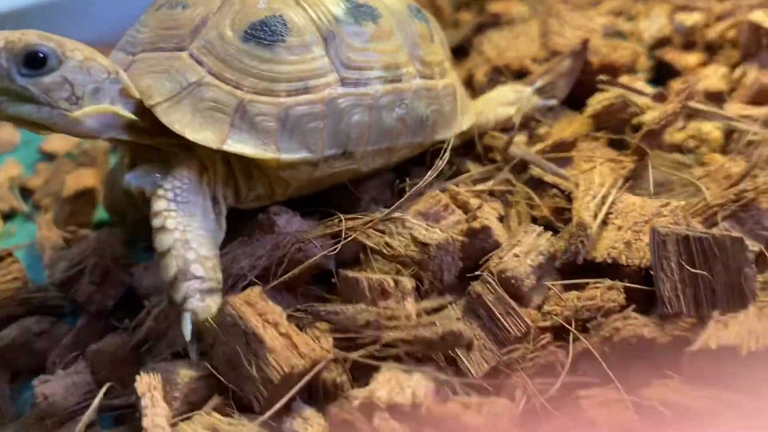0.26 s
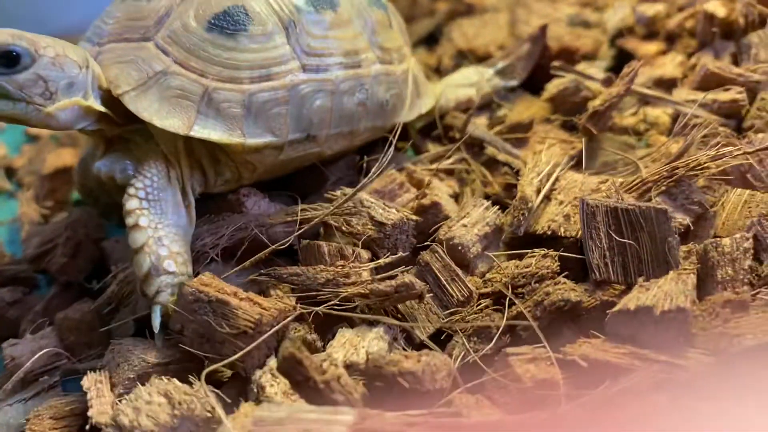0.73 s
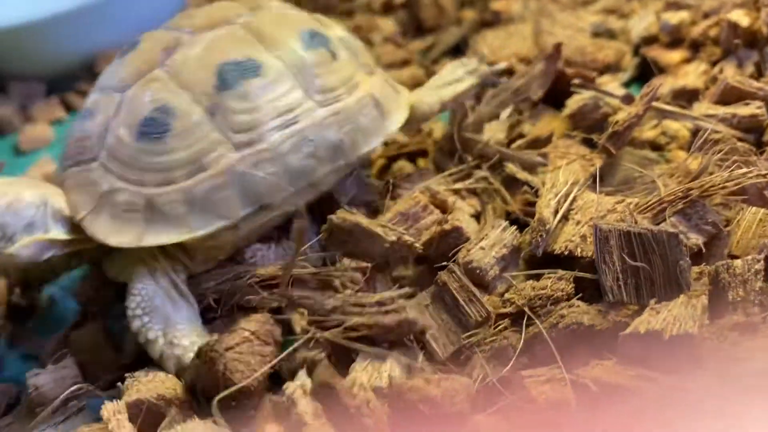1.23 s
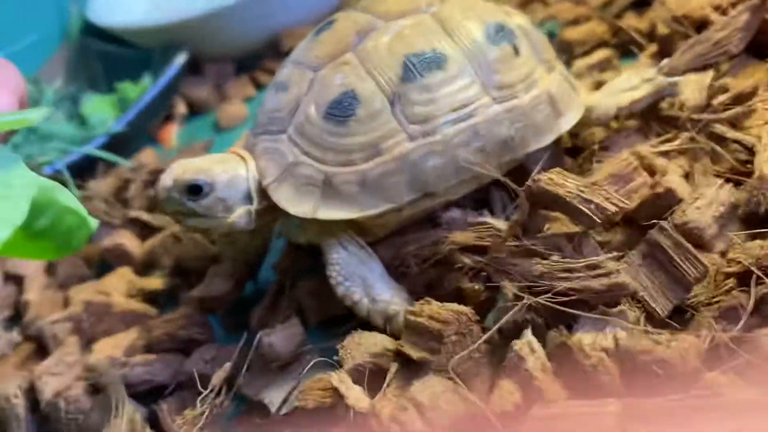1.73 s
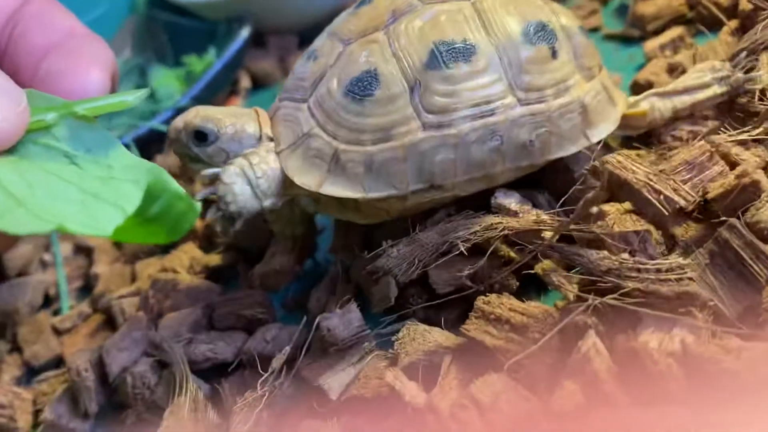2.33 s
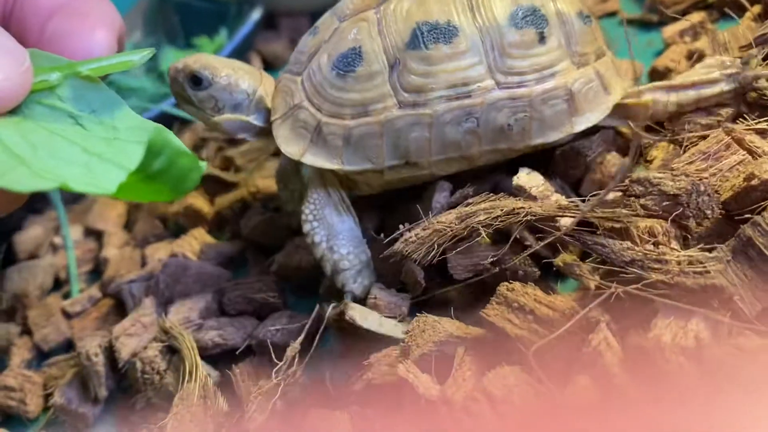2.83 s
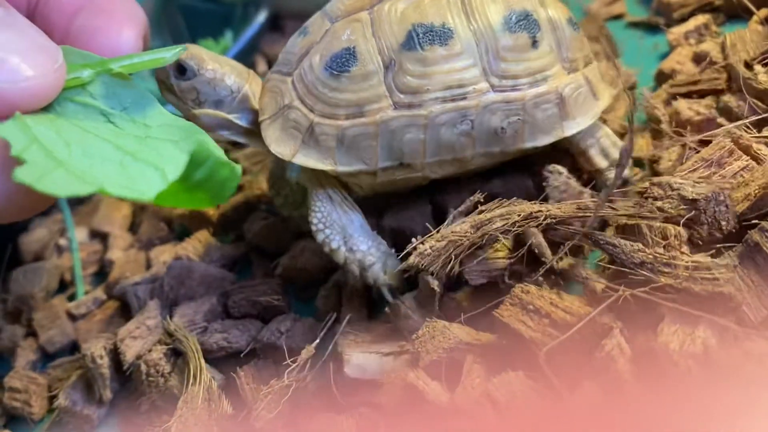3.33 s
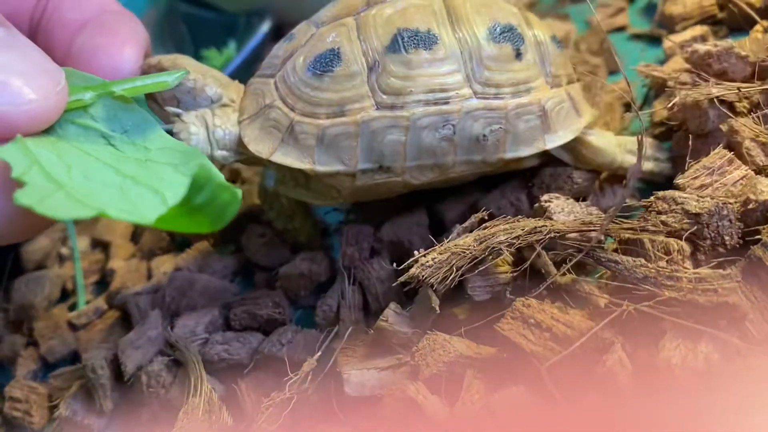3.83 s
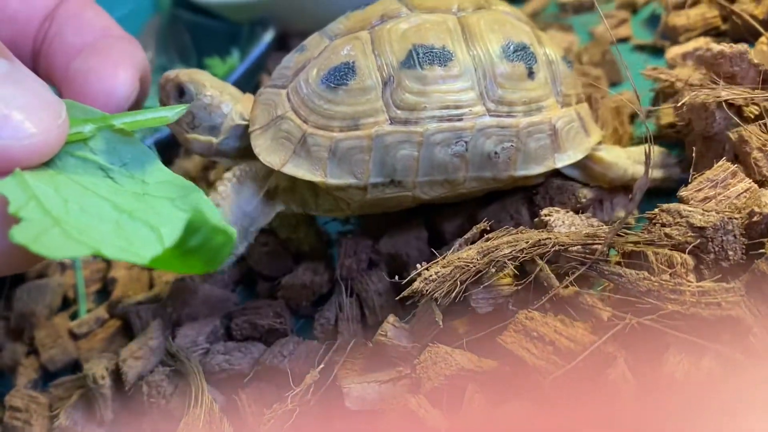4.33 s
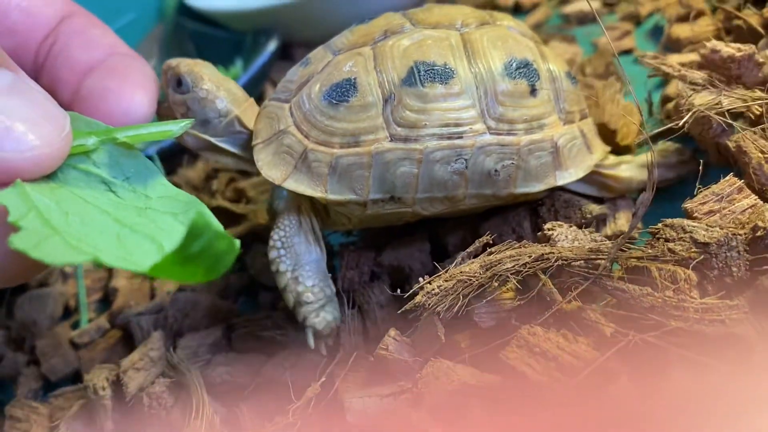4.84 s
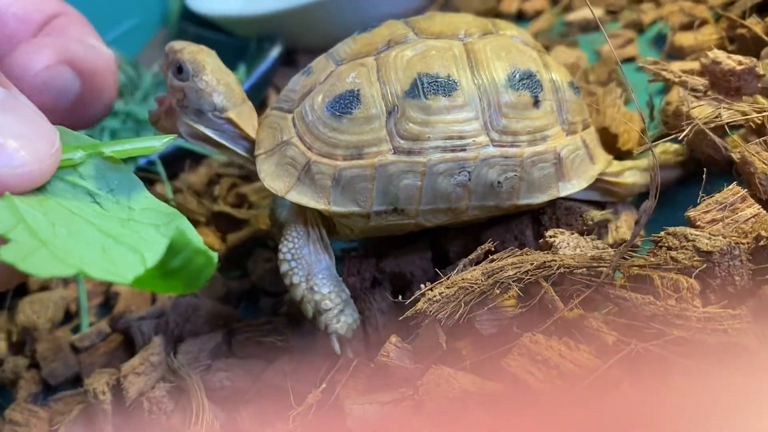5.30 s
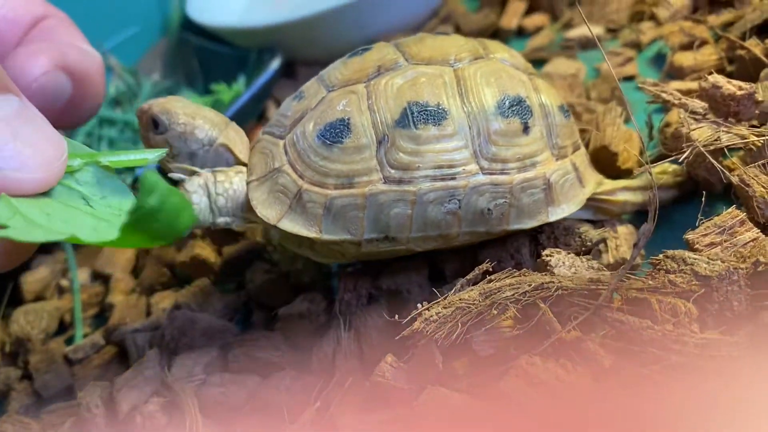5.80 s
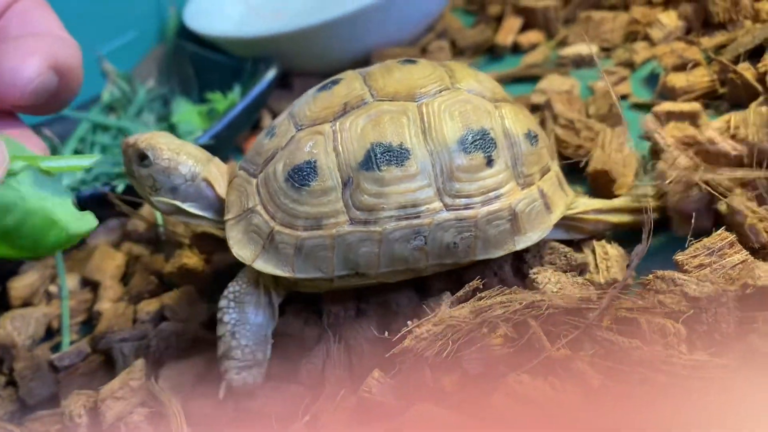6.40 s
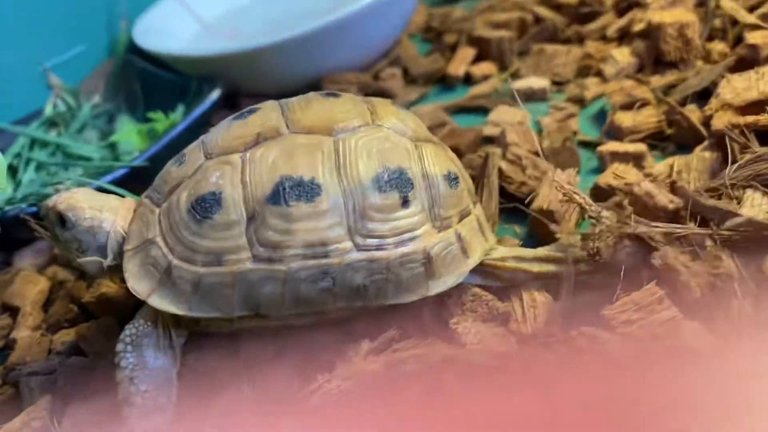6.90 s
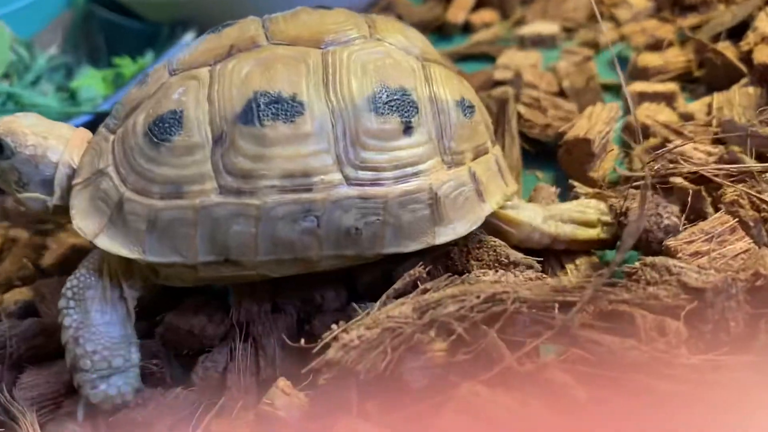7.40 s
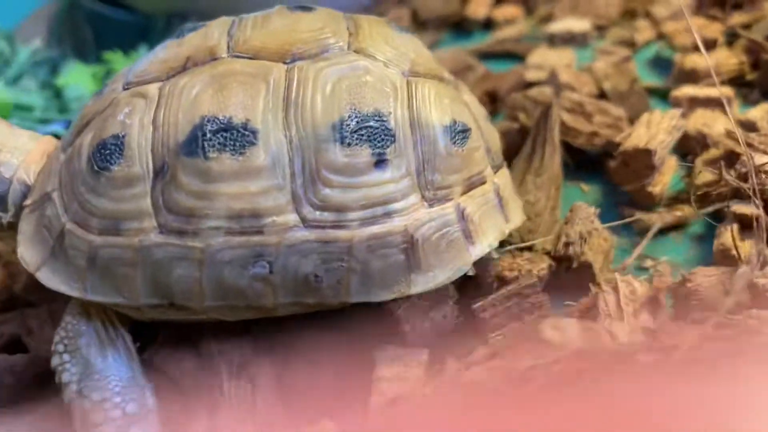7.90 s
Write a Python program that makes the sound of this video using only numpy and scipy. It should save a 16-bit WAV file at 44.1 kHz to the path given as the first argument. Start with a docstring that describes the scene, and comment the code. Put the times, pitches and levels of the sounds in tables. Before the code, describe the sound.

Dry chips rustle, tick and knock in irregular clusters under slow little feet, with low rumbles through the plastic floor. Early on, several dull bumps thud against the tub. The middle is sparse and delicate, over faint room murmur and low hum. Finally the crunching grows stronger, with bright snaps and a momentary squeak. Very close, dry stereo pickup with short tub reflections.

```python
"""A quiet room, microphone pair close to a plastic tub where a small tortoise walks over dry wood chips.
The chips rustle and snap under its feet: clumped grains of noise, coloured for grinding, hiss and rumble.
Its weight rumbles in the tub floor; early on the tub takes soft bumps, falling tones with a dull knock,
while a hand brings in a leaf. Late on a claw squeaks on a chip, a gliding tone with grit.
Dragged and struck chips ring, and the tub walls reflect it all over a faint murmur and hum."""
import sys
import numpy as np
from scipy import signal
from scipy.fft import rfft, irfft, next_fast_len
from scipy.io import wavfile

SR = 44100
rng = np.random.default_rng(int(sys.argv[2]) if len(sys.argv) > 2 else 0)


def pcm_store(signal):
    """Save signal as 16-bit PCM."""
    levels = np.round(np.clip(np.atleast_2d(signal), -1, 1) * 32767)
    wavfile.write(sys.argv[1], SR, levels.astype(np.int16).T)


N = 359415
TIME = np.arange(N) / SR

# colour of the finest breaking: hz, level_db
SNAP = [(1200, -21.5), (3000, -7.5), (5000, -5), (8000, -4), (12500, -0.5), (14500, -10), (16000, 3)]


def amp(db):
    """Decibels to gain."""
    return 10 ** (np.asarray(db) / 20)


def evened(x):
    """Scales to an rms of one."""
    return x / np.sqrt(np.mean(x ** 2) + 1e-20)


def colour(x, points, size=8192):
    """Filters by a spectrum of (Hz, dB) points, causally, so that attacks stay sharp."""
    f, db = np.transpose(points)
    gain = amp(np.interp(np.log(np.fft.rfftfreq(size, 1 / SR) + 1), np.log(f), db))
    # folding the cepstrum gives the minimum-phase filter
    cepstrum = irfft(np.log(gain))
    cepstrum[1:size // 2] *= 2
    cepstrum[size // 2 + 1:] = 0
    taps = irfft(np.exp(rfft(cepstrum)))[:size // 2]
    return signal.oaconvolve(x, np.array(taps, ndmin=x.ndim), axes=-1)[..., :x.shape[-1]]


def resonate(x, hz, width):
    """One resonance of gain one at its peak."""
    return signal.lfilter(*signal.iirpeak(min(hz, SR / 2 - 1), hz / width, SR), x)


def resonate_twice(x, hz, width):
    """The same resonance passed twice, for steeper sides."""
    return resonate(resonate(x, hz, width), hz, width)


def wander(length, rate):
    """Random drift of about unit size, in straight lines between rate random points a second."""
    knots = rng.standard_normal(length // 20 + 2)
    return np.interp(np.arange(length) * rate / SR, np.arange(len(knots)), knots)


def add(mix, s, sound):
    """Mixes a sound in at s seconds."""
    part = mix[..., max(round(s * SR), 0):][..., :sound.shape[-1]]
    part += sound[..., :part.shape[-1]]


def play(table, source):
    """Sounds every row of an event table at its time."""
    out = np.zeros(N)
    for s, *row in table:
        add(out, s, source(*row))
    return out


def grains(per_s, spread_db, clump_db, clump_rate, apart):
    """Tiny slips of uneven size in clumps; apart (0-1) is how differently the two microphones hear each."""
    size = amp(spread_db * np.minimum(rng.exponential(1, N), 4)) * rng.choice([-1, 1], N)
    apart = np.clip(apart, 0, 1)
    heard = np.sqrt(1 - apart) + np.sqrt(apart) * rng.choice([-1, 1], (2, N))
    happens = rng.random(N) < per_s / SR
    return heard * size * happens * amp(clump_db * wander(N, clump_rate))


def swell(start, length):
    """The shape of one push: it swells, holds and dies away exponentially."""
    attack_s, release_s = 0.0347, 0.058
    before = np.maximum(start - TIME, 0)
    after = np.clip(TIME - start - length, 0, 1)
    return np.exp(-before / attack_s - after / release_s)


def room():
    """Almost steady indoor murmur of ventilation: both microphones share the bass, not the hiss."""
    # colour of the murmur: hz, level_db
    room_colour = [(20, -28), (40, -9.5), (70, -2), (110, -10.5), (170, -10.5), (280, -14.5), (450, -19),
                   (700, -21), (1100, -29.5), (2500, -37), (5200, -51.5), (5600, -33.5), (6000, -70),
                   (15000, -102)]
    shared, apart = rng.standard_normal(N), rng.standard_normal((2, N))
    bass = colour(shared, [(150, 6.0), (600, -8), (1500, -11.0)])
    upper = colour(apart, [(60, -11.0), (300, -2), (1200, 1.0)])
    return amp(-56.0) * evened(colour(bass + upper, room_colour)) * amp(0.38 * wander(N, 4.3))


def hum_swell(length, db):
    """A low tone rises and sinks again."""
    t = np.arange(0, length, 1 / SR)
    return amp(db) * np.sin(2 * np.pi * 137.5 * t) * np.sin(np.pi * t / length) ** .5


def hum():
    """Faint low tones that waver, being resonant noise; another low tone swells twice."""
    # the room's low tones: hz, width_hz (of each of two passes), level_db
    hum_tones = [(75.8, 24, -68), (158.6, 20, -78), (245.14, 11.5, -69), (335.7, 30, -78),
                 (467.7, 11, -79.5), (691.6, 27, -80)]
    # the swelling tone: start_s, length_s, level_db
    hum_swells = [(0.0, 0.473, -51), (5.83, 0.34, -51.5)]
    tones = sum(amp(db) * evened(resonate_twice(rng.standard_normal(N), hz, width))
                for hz, width, db in hum_tones)
    return tones + play(hum_swells, hum_swell)


def strokes():
    """Legs push through the bedding: pressure and brushing over time, as gains summed in power."""
    # pushes of a leg: start_s, length_s, pressure_db (on the chips), brush_db (on dry fibres)
    pushes = [(0.0, 0.055, -68, -80), (0.142, 0.1, -67, -71.5), (0.49, 0.182, -68.5, -72),
              (0.838, 0.037, -71, -72.5), (1.047, 0.21, -58.5, -60), (1.39, 0.213, -72, -76.5),
              (1.6, 0.53, -64, -72), (2.23, 0.18, -63.5, -71.5), (2.623, 0.47, -72, -73),
              (2.753, 0.0218, -62.5, -74.5), (3.052, 0.242, -65.5, -71), (3.182, 0.02, -65, -61),
              (3.433, 0.0913, -64.5, -70.5), (3.617, 0.0925, -62, -67), (3.985, 0.1267, -62.5, -74),
              (4.346, 0.03, -65, -75), (4.572, 0.224, -78.5, -79), (5.258, 0.04, -59.5, -68),
              (5.39, 0.025, -67.5, -76), (5.535, 0.116, -69, -84), (5.883, 0.1015, -69, -76),
              (6.087, 0.014, -62.5, -75), (6.235, 0.0194, -63.5, -78), (6.303, 0.0544, -62.5, -75),
              (6.603, 0.498, -69, -79.5), (6.88, 0.136, -62.5, -73.5), (7.2, 0.34, -62, -71),
              (7.527, 0.023, -60, -73), (7.598, 0.11, -54.5, -61.5), (7.743, 0.087, -54.5, -57),
              (7.88, 0.13, -62, -69), (8.111, 0.028, -55, -64.5)]
    # the legs never quite come to rest
    idle_pressure_db, idle_brush_db = -81, -89
    power = amp([[idle_pressure_db], [idle_brush_db]]) ** 2 * np.ones(N)
    for start, length, pressure_db, brush_db in pushes:
        power += amp([[pressure_db], [brush_db]]) ** 2 * swell(start, length) ** 2
    return np.sqrt(power)


def weight(pressure):
    """Gain of the floor's rumble: it follows the pressure and rises with each heave."""
    # the whole weight shifts: start_s, length_s, level_db
    heave_rows = [(0.006, 0.629, -53), (0.75, 0.19, -55), (1.058, 0.3, -47), (2.268, 0.21, -54.5),
                  (2.764, 0.14, -59.5), (4.026, 0.024, -52.5), (5.272, 0.033, -65), (6.089, 0.0394, -45.5),
                  (6.214, 0.07, -50.5), (6.311, 0.19, -53), (7.582, 0.3, -54), (8.09, .05, -49.5)]
    # rumble level at a firm push, and dB gained per dB of pressure
    firm_db, rumble_db, rumble_slope = -59, -52, 0.59
    heaves = sum(amp(db) * swell(start, length) for start, length, db in heave_rows)
    pressed = amp(rumble_db) * (pressure / amp(firm_db)) ** rumble_slope
    return np.hypot(pressed, heaves)


def scrape(length, db, hz, width_hz):
    """A chip drags: uneven slips wake short resonances, whose pitch wanders as the contact moves."""
    # resonances the slips wake: multiple (of the scrape's pitch), level_db
    dragged = [(.47, -17), (1, 5), (1.65, -12.5)]
    slips_per_s, slip_spread_db, drift = 1300, 4.5, .045
    count = int(length * SR)
    size = amp(slip_spread_db * rng.standard_normal(count))
    slips = size * (rng.random(count) < slips_per_s / SR) + .02 * rng.standard_normal(count)
    turns = np.cumsum(hz * (1 + drift * wander(count, 170))) / SR
    r = np.exp(-np.pi * width_hz / SR)
    sound = np.zeros(count)
    for k, level in dragged:
        # shift the moving pitch down to zero, resonate there with a double pole, shift back
        turn = np.exp(2j * np.pi * k * turns)
        sound += amp(level) * (turn * signal.lfilter([1], [1, -2 * r, r * r], slips / turn)).real
    return amp(db) * evened(sound) * signal.windows.tukey(count, .5)


def loose_chips():
    """Loose chips are rubbed in short random spells, each at a pitch, strength and side of its own."""
    # pitches of rubbed loose chips before detuning: pitch_hz
    loose = [670, 880, 1450, 1650, 1760, 1990, 2380, 2770, 3760, 4590]
    spells_per_s, spell_s, spell_spread_db = 130, .014, 3.5
    out = np.zeros((2, N))
    for when, which, detune, size, side in rng.random((int(spells_per_s * N / SR), 5)):
        hz = loose[int(which * len(loose))] * (.93 + .14 * detune)
        # higher chips are weaker
        db = spell_spread_db * min(-np.log(1 - size), 3) - 3.6 * np.log2(hz / loose[0])
        pan = np.sqrt([[side], [1 - side]])
        add(out, when * N / SR, pan * scrape(spell_s, db, hz, 300))
    return evened(out)


def rustle():
    """Feet press the bedding: the tub floor rumbles, chips grind, dry fibres hiss and now and then tick."""
    # colours of floor, chips and fibres: hz, level_db
    rumble_colour = [(25, -16), (55, 4), (120, 0.5), (190, -2), (240, -1.5), (290, -10), (345, -2),
                     (420, -19), (530, -24.5), (660, -11.5), (1100, -48.5), (2500, -69.5)]
    grind_colour = [(250, -51.5), (580, 3.5), (700, 2), (900, 2), (1150, -5), (1550, 0), (1720, -2),
                    (2000, -5), (2500, -9), (4500, -15.5), (6000, -19), (12000, -46)]
    hiss_colour = [(900, 0.5), (2000, 4.5), (4000, 0), (5500, 0), (7300, 3.5), (9500, -0.5), (12800, 4.5),
                   (14500, 0), (16000, -18.5)]
    grind_gain, hiss_gain = strokes()
    rumble_gain = weight(grind_gain)
    floor = grains(per_s=900, spread_db=0.0, clump_db=4.5, clump_rate=35, apart=0.11)
    rumble = evened(colour(floor, rumble_colour))
    rubbed = grains(per_s=1800, spread_db=2.0, clump_db=5.0, clump_rate=83, apart=0.39)
    grind = evened(colour(rubbed, grind_colour))
    brushed = grains(per_s=6000, spread_db=2.0, clump_db=3.0, clump_rate=120, apart=0.029)
    hiss = evened(colour(brushed, hiss_colour))
    broken = grains(per_s=130, spread_db=5, clump_db=2.5, clump_rate=15, apart=.2)
    ticks = amp(-6.5) * evened(colour(broken, SNAP))
    chips = amp(-1.0) * grind + amp(-7.5) * loose_chips()
    # the rumble leans to the right microphone
    floor_part = amp([[-1.4], [1.4]]) * rumble * rumble_gain
    return floor_part + chips * grind_gain + (amp(2.0) * hiss + ticks) * hiss_gain


def fibre(db):
    """A dry fibre breaks at once: a thin, bright tick of decaying noise."""
    t = np.arange(SR // 50) / SR
    tick = colour(rng.standard_normal(len(t)) * np.exp(-t / .0008), SNAP)
    return amp(db) * tick / abs(tick).max()


def chip(crack_db, ring_hz, thud_db, snap_db):
    """A chip gives way: slips build up and die in milliseconds, it rings and knocks on the tub floor."""
    # colours of the crack and of the thud on the floor: hz, level_db
    crack_colour = [(200, 0.5), (500, -3.5), (820, 6), (1150, -3.5), (1650, 1.5), (2200, -7.5), (4500, -15),
                    (6500, -25.5), (10000, -29)]
    thud_colour = [(30, -1), (70, -9.5), (150, 3), (240, 0), (290, -8), (350, 0.5), (430, -13.5),
                   (550, -16), (700, -16.5), (1200, -47.5)]
    t = np.arange(SR // 10) / SR
    a, b, c = rng.standard_normal((len(t), 3)).T
    build_s = 0.002
    u = t / build_s
    burst = (u * np.exp(1 - u)) ** 2 + amp(-27) * np.exp(-t / .009)  # with a faint tail
    crack = colour(a * burst, crack_colour)
    crack = evened(crack) + amp(-2) * evened(resonate(crack, ring_hz, width=400))
    snap = colour(b * (u * np.exp(1 - 1.07 * u)) ** 2, SNAP)  # the finest fibres break first
    thud = colour(c * t * np.exp(-t / 0.0057), thud_colour)
    parts = ((crack, crack_db), (snap, snap_db + 9.0), (thud, thud_db + 0.5))
    return sum(amp(db) * x / abs(x).max() for x, db in parts)


def bump(db, start_hz, end_hz, swell_s, knock_db, knock_hz):
    """A dull knock, then bending waves in the tub: the high ones come first, so the thump falls in pitch."""
    # the tub's ring: hz (before random detuning), level_db, t60_s
    tub_modes = [(53, -7.5, .19), (74, -11, .22), (152, -19, .17), (320, -15, .06), (362, -13.5, .07),
                 (468, -23, .06), (675, -29, .07), (910, -39, .05)]
    # colour of the contact: hz, level_db
    knock_colour = [(200, 5.5), (380, -1), (520, -18.5), (680, -6), (920, -13), (1250, -18.5), (2000, -22),
                    (4000, -38.5), (8000, -42)]
    t = np.arange(SR // 3) / SR
    hz = end_hz + (start_hz - end_hz) * np.exp(-t / 0.0066)
    wave = np.sin(2 * np.pi * np.cumsum(hz) / SR) * (t / swell_s * np.exp(1 - t / swell_s)) ** 3.8
    modes = np.zeros(len(t))
    for f, level, t60 in tub_modes:
        tone = np.sin(2 * np.pi * f * rng.uniform(0.909, 1.027) * t)
        # each mode takes about a cycle to build up
        modes += amp(level - 60 * t / t60) * tone * (1 - np.exp(-t * f))
    contact = colour(rng.standard_normal(len(t)) * np.exp(-t / 0.0051), knock_colour)
    # the struck spot rings briefly
    wall = np.sin(2 * np.pi * knock_hz * t) * np.exp(-t / 0.0071) * (1 - np.exp(-t * knock_hz))
    knock = amp(-1) * contact / abs(contact).max() + amp(-7) * wall
    return amp(db) * (wave + modes) + amp(knock_db - 4.5) * knock


def tub():
    """Bumps at each microphone: the left is fuller near 230 Hz, a rocking floor mode flips the right."""
    # soft bumps: start_s, level_db, start_hz, end_hz, swell_s, knock_db (before a trim), knock_hz
    bump_rows = [(1.5675, -6.5, 244, 114.6, 0.009, -21.5, 920),
                 (1.596, -22, 183, 160, 0.0092, -30.5, 680.5), (1.626, -21, 165, 141, 0.01374, -29, 890),
                 (1.66, -35, 160, 100, 0.016, -72, 680), (1.773, -26, 221, 70.6, 0.011, -64, 680),
                 (1.869, -16.5, 268, 95, 0.012, -29, 790), (1.897, -25.5, 108.7, 65, 0.0159, -45, 690),
                 (1.955, -38.5, 110, 70, 0.016, -70, 680), (2.0745, -18, 250, 81.7, 0.015, -26, 660),
                 (2.108, -17.5, 153, 87, 0.0087, -58, 676), (2.145, -42, 170, 111, 0.015, -70, 660),
                 (7.584, -33, 482, 332, 0.0045, -38, 461.3)]
    # floor mode that pushes the right microphone the other way: hz, width_hz, level_db
    rocking = (397, 200, 8.9)
    bumps = play(bump_rows, bump)
    hz, width, db = rocking
    left = colour(bumps, [(130, -1.0), (230, 4), (350, -1.5), (600, 1.5), (900, 0.0)])
    right = bumps - amp(db) * resonate(bumps, hz, width)
    return np.array([left, right])


def ring(db, hz, t60):
    """A hard chip rings on after it is struck, with a close pair of modes."""
    t = np.arange(SR // 8) / SR
    second_hz = hz * rng.uniform(1.03, 1.09)
    pair = np.sin(2 * np.pi * hz * t) + amp(-7) * np.sin(2 * np.pi * second_hz * t)
    return amp(db - 60 * t / t60) * pair * (1 - np.exp(-t * hz))


def rubbing():
    """Long, soft rubs: dense, fine slips keep a few resonances of the chips sounding."""
    # rubs over the chips: start_s, length_s, level_db
    rubs = [(1.7, .19, -63), (1.93, 0.049, -69), (2.03, 0.255, -70.5)]
    # resonances of the rubbed chips: hz, width_hz (of each of two passes), level_db
    rubbed = [(1440, 170, -1.5), (1680, 210, -2.5), (2536, 300, -9), (2960, 300, -7.5)]
    slips = grains(per_s=2500, spread_db=2, clump_db=3, clump_rate=110, apart=.5)
    body = sum(amp(db) * resonate_twice(slips, hz, width) for hz, width, db in rubbed)
    power = sum((amp(db) * swell(start, length)) ** 2 for start, length, db in rubs)
    return evened(body) * np.sqrt(power)


def squeak(length, db, start_hz, end_hz, grit_db):
    """A claw sticks and slips at a chip's pitch; grit unsteadies it and wakes the other resonances."""
    # resonances of the squeaking chip: hz, width_hz (of each of two passes), level_db
    scraped = [(1735, 250, 0.5), (2290, 223, 7), (2626, 120, 13.5), (3740, 340, 7.5), (4250, 400, 2),
               (5080, 720, -3.5), (7060, 2200, -10.5), (11980, 4000, -9.5)]
    count = int(length * SR)
    uneven = min(amp(grit_db), 1)
    hz = np.linspace(start_hz, end_hz, count) * (1 + 0.045 * uneven * wander(count, 600))
    tone = np.sin(2 * np.pi * np.cumsum(hz) / SR) * amp(3.5 * uneven * wander(count, 500))
    slips = rng.standard_normal(count) * amp(3 * wander(count, 560))
    grit = sum(amp(level) * resonate_twice(slips, f, w) for f, w, level in scraped)
    return amp(db) * (evened(tone) + amp(grit_db) * evened(grit)) * signal.windows.tukey(count, .3)


def walls(x, t60=.065):
    """Short, dense reflections (decaying noise over t60 seconds), different at each microphone."""
    t = np.arange(SR // 5) / SR
    tail = rng.standard_normal((2, len(t))) * amp(-60 * t / t60) * (t > .001)
    tail = tail / np.linalg.norm(tail[0])
    tail = colour(tail, [(60, -10), (300, -2), (900, 0), (3000, -4), (12000, -7)])
    return signal.fftconvolve(x[None], tail, axes=1)[:, :N]


def scene():
    """Bedding, claws and bumps, scattered by nearby chips and reflected by the tub, heard over the room."""
    # Event levels are ahead of the final mix.
    # dry fibres breaking: start_s, level_db
    fibre_rows = [(0.022, -46.5), (1.1149, -34.5), (1.2525, -33), (3.181, -35), (3.626, -47), (3.947, -52),
                  (4.3105, -45.5), (6.245, -47), (6.303, -45), (7.0534, -40.5), (7.3267, -35), (7.656, -35),
                  (7.944, -38), (7.977, -29), (8.018, -32)]
    # louder chips snapping and knocking: start_s, crack_db, ring_hz, thud_db, snap_db (last two before trims)
    chip_rows = [(0.185, -45, 770, -44, -56), (0.217, -46.5, 4500, -66, -51.5),
                 (0.672, -52, 1300, -62.5, -52), (1.04, -34.5, 1670, -38, -40), (1.056, -40, 880, -42, -62),
                 (1.066, -48, 2000, -47, -62), (1.1015, -43, 3280, -61, -42),
                 (1.114, -38, 5520, -44, -36.5), (1.123, -49, 1700, -47, -60), (1.138, -46, 900, -42, -62),
                 (1.218, -48, 2900, -48.5, -61), (1.186, -42, 921, -40, -52.5),
                 (1.24, -34, 1673, -34.5, -65.5), (1.252, -28.5, 1420, -27.5, -35),
                 (1.281, -42, 1100, -46, -63), (1.301, -42, 1220, -53, -68),
                 (1.3155, -31.5, 1420, -43, -66), (1.35, -50.5, 3400, -47, -55),
                 (1.579, -38.5, 1900, -41, -66), (1.601, -42.5, 2760, -43.5, -60),
                 (1.607, -48, 2900, -52.5, -69), (1.641, -47.5, 6400, -42.5, -63),
                 (1.678, -42.5, 1500, -39, -66), (1.713, -41, 1494, -43, -52.5),
                 (1.774, -43, 1870, -55, -75), (1.814, -41, 1750, -63, -77), (1.948, -47, 1610, -55.5, -76),
                 (1.986, -47, 1800, -47, -77), (2.034, -57, 2610, -60, -70.5), (2.088, -52, 1800, -54, -69),
                 (2.353, -42.5, 1690, -38, -64), (2.39, -50, 1900, -47, -72), (2.458, -44, 1470, -42, -80),
                 (2.527, -51, 1710, -66.5, -84), (2.676, -45, 1784, -43.5, -75),
                 (2.786, -47.5, 1376, -47, -55.5), (3.2, -28.5, 1780, -41, -61),
                 (3.201, -38.5, 850, -47, -66), (3.244, -45.5, 1710, -37.5, -52),
                 (3.493, -49, 1930, -41, -73), (3.659, -46, 2035, -38, -62.5), (4.055, -39, 1770, -43, -66),
                 (4.091, -50, 1850, -55, -68), (4.209, -53.5, 2550, -62, -59),
                 (4.354, -47, 5000, -47.5, -73), (4.394, -50, 5020, -63, -66),
                 (4.414, -54, 1700, -60, -70.5), (4.599, -52.5, 3220, -58, -62),
                 (4.529, -54.5, 3440, -59.5, -63.5), (4.683, -59, 2960, -55, -61),
                 (5.053, -49, 1670, -63.5, -90), (5.191, -50.5, 1587, -56.5, -59),
                 (5.206, -60.5, 1400, -60, -59), (5.264, -45, 900, -40, -67), (5.278, -43, 1200, -41, -63),
                 (5.294, -47, 1000, -40, -62), (5.319, -39.5, 1796, -42, -59),
                 (5.371, -52.5, 2700, -60, -70.5), (5.399, -47, 2476, -60, -59),
                 (5.434, -47, 4950, -56, -59), (5.444, -51, 1900, -58, -68), (5.53, -54, 1800, -53, -70),
                 (5.586, -48, 2110, -47, -60), (6.095, -55, 1770, -37, -74), (6.223, -53, 800, -41.5, -77),
                 (6.243, -49, 750, -42, -70), (6.302, -47, 1390, -58.5, -57), (6.448, -53, 1300, -39, -80),
                 (6.967, -55, 1350, -64, -48), (7.17, -44.5, 850, -40.5, -57.5),
                 (7.278, -52, 1720, -42.5, -50), (7.325, -36.5, 6260, -45, -55),
                 (7.583, -43, 1580, -39, -46), (7.604, -46, 650, -37, -60),
                 (7.636, -37.5, 1640, -62, -41.5), (7.747, -35, 1200, -34, -33.5),
                 (7.82, -27, 1700, -43, -44), (7.8705, -26, 3720, -42, -33),
                 (7.8995, -38, 3757, -35.5, -41), (7.972, -45.5, 1700, -44, -40.5),
                 (8.017, -29.5, 3600, -33, -33), (8.0765, -34.5, 1470, -40.5, -65),
                 (8.125, -40, 1641, -40, -38.5)]
    # chips dragged over their neighbours: start_s, length_s, level_db, pitch_hz, width_hz
    scrape_rows = [(0.548, 0.031, -64, 2190, 1500), (1.026, 0.022, -58.5, 2900, 1200),
                   (1.033, 0.025, -57, 1620, 700), (1.045, 0.036, -59, 904, 500),
                   (1.18, 0.0185, -57.5, 1900, 1500), (1.255, 0.048, -60, 1700, 900),
                   (1.559, 0.013, -53, 1500, 1500), (1.694, 0.03, -54.5, 1675, 500),
                   (1.856, .024, -55, 1720, 600), (1.866, 0.0276, -62, 3040, 500),
                   (2.315, 0.028, -64, 3180, 2000), (3.238, 0.044, -63, 1740, 600),
                   (3.644, 0.0108, -56.5, 2970, 600), (3.69, 0.073, -56, 1870, 380),
                   (4.925, 0.07, -72, 3000, 550), (5.253, 0.038, -63, 2530, 400),
                   (5.264, 0.051, -59.5, 900, 900), (5.275, 0.066, -65, 4800, 2200),
                   (5.955, 0.068, -71, 3000, 600), (6.355, 0.0192, -63, 2720, 1700),
                   (6.92, 0.026, -58, 1500, 1000), (7.53, 0.043, -54.5, 1853, 795),
                   (7.636, .028, -47.5, 1930, 800), (7.680, 0.036, -48, 1900, 1000),
                   (7.706, .028, -47, 1400, 1200), (7.726, 0.014, -38.5, 1764, 500),
                   (7.808, 0.028, -45.5, 953, 900)]
    # struck chips ringing on: start_s, level_db, pitch_hz, t60_s
    ring_rows = [(1.58, -52, 3560, 0.047), (1.58, -60, 5800, .09), (1.58, -47, 1720, .04),
                 (1.814, -46, 1730, 0.091), (2.354, -47, 670, .05), (2.459, -49, 697, 0.067),
                 (3.201, -42, 1753, 0.053), (5.321, -48.5, 1760, 0.0364), (7.872, -34.5, 3578, 0.019),
                 (7.901, -41, 820, 0.0325)]
    # claws squeaking: start_s, length_s, level_db, start_hz, end_hz, grit_db (relative to the tone)
    squeak_rows = [(7.714, 0.024, -52, 2520, 2470, -14), (7.731, 0.01, -41, 2480, 2500, 2),
                   (7.7355, 0.022, -31.5, 2498, 2434, -8.5), (7.755, 0.02, -38.5, 2450, 2656, -0.5),
                   (7.778, 0.02, -52, 2630, 2500, -2.5), (7.8, 0.00917, -32.5, 2480, 2440, -0.5),
                   (7.8065, 0.019, -30.5, 2443, 2720, 2), (7.823, .012, -43, 2617, 2510, 4.5)]
    bedding = rustle() + rubbing()
    clicks = play(fibre_rows, fibre) + play(chip_rows, chip) + play(scrape_rows, scrape)
    clicks += play(ring_rows, ring) + play(squeak_rows, squeak)
    scattered = amp(-12) * walls(clicks + bedding.mean(0), t60=.008)
    reflected = walls(amp(-7.5) * bedding.mean(0) + amp(-7.5) * clicks)
    direct = amp(-0.55) * bedding + amp(-1.74) * clicks
    background = amp([[-0.4], [0.4]]) * (room() + hum())
    return direct + scattered + reflected + tub() + background


def record(dry):
    """The two channels differ in level and phase from band to band; then a low cut and a band limit."""
    # the two channels: hz, left_minus_right_db, left_lead_rad
    pair_points = [(60, .5, 0), (200, -.5, 0), (380, -.5, 0), (700, 3, -.1), (1050, 2.5, 0), (1450, 3, 1.9),
                   (2000, 0, 1.3), (2600, -1, .9), (3450, -1.5, -.7), (5500, -2, -.9), (6800, -.5, .1),
                   (8500, 0, 3.1), (9700, 0, 3.2), (11800, 0, 6.2), (13100, 0, 6.4), (14800, 0, 9.4)]
    size = next_fast_len(N + 4096)
    f, db, lead = np.transpose(pair_points)
    hz = np.fft.rfftfreq(size, 1 / SR)
    # each channel takes half of the difference
    half = amp(np.interp(hz, f, db) / 2) * np.exp(.5j * np.interp(hz, f, lead))
    pair = irfft(rfft(dry, size) * np.array([half, 1 / half]), size)[:, :N]
    pair = signal.sosfilt(signal.butter(4, 40, "highpass", fs=SR, output="sos"), pair)
    edge_hz = 16000
    low_pass = signal.firwin(511, edge_hz, window=("kaiser", 9), fs=SR)
    return signal.oaconvolve(pair, low_pass[None], "same")


dry = scene()
out = record(dry)
pcm_store(out)
```